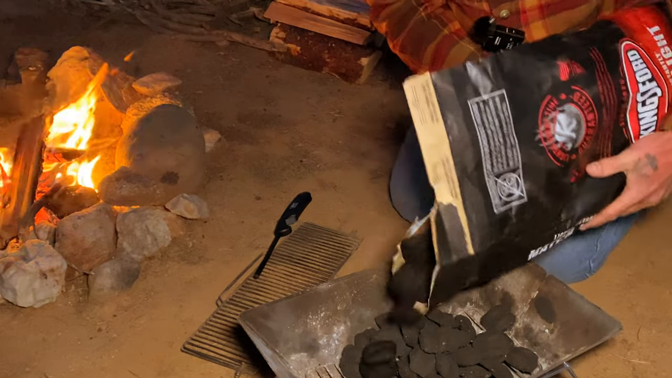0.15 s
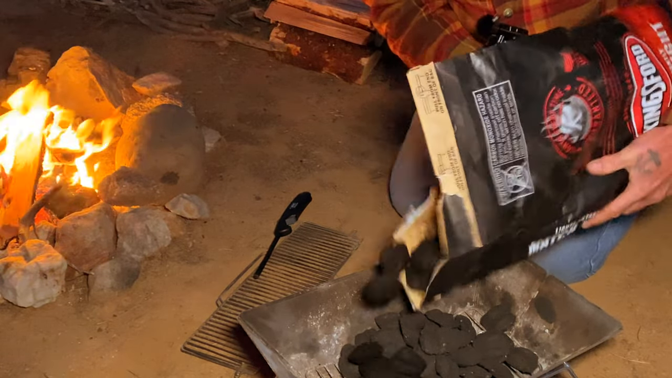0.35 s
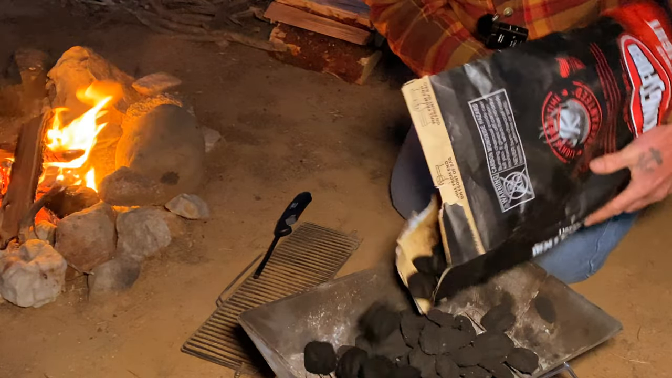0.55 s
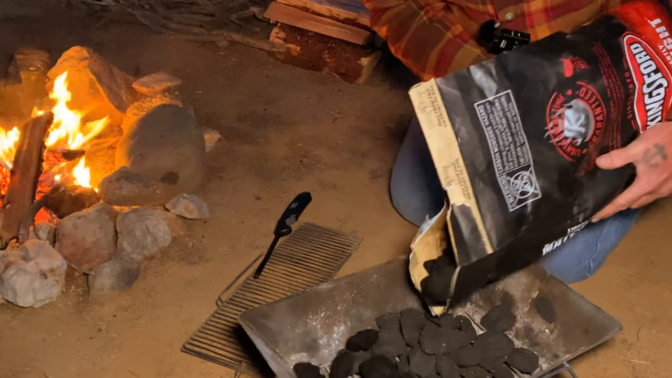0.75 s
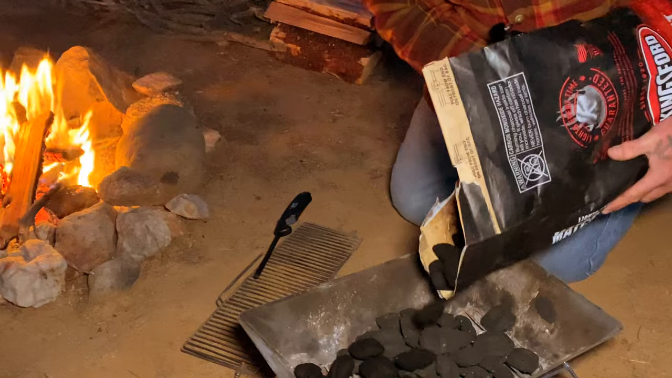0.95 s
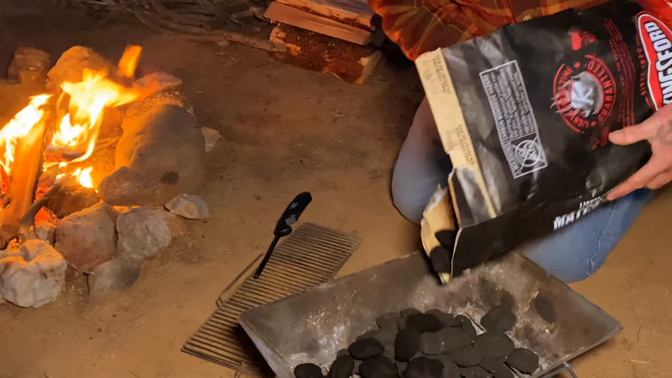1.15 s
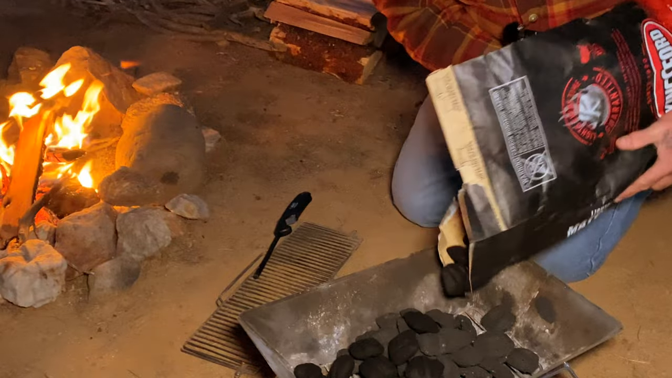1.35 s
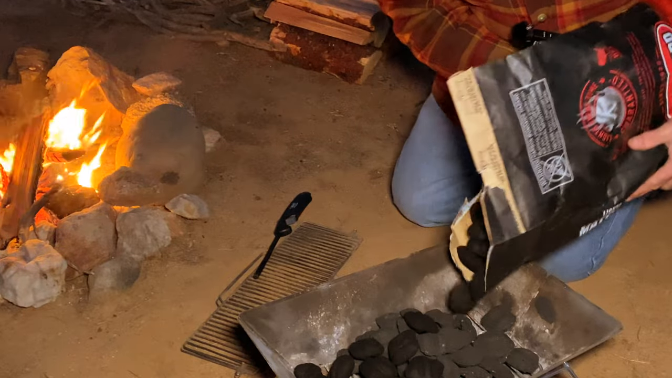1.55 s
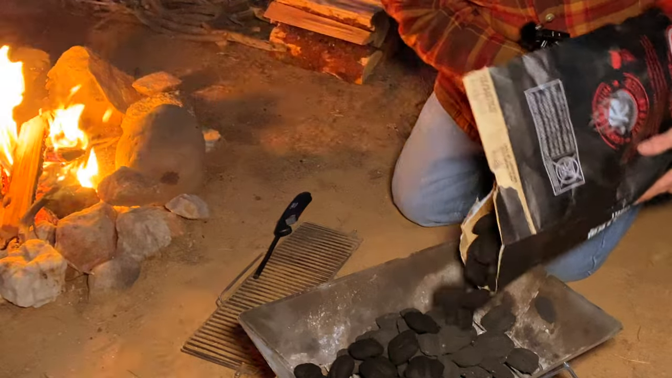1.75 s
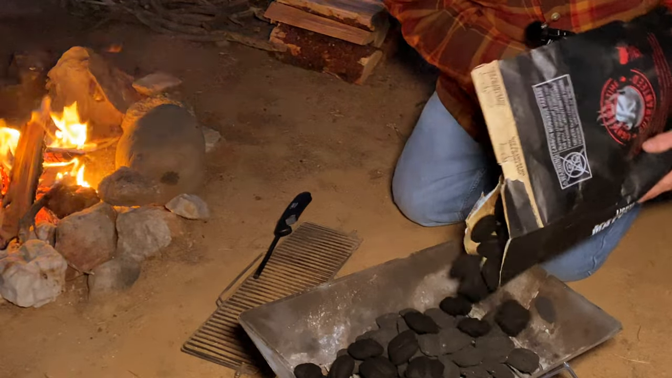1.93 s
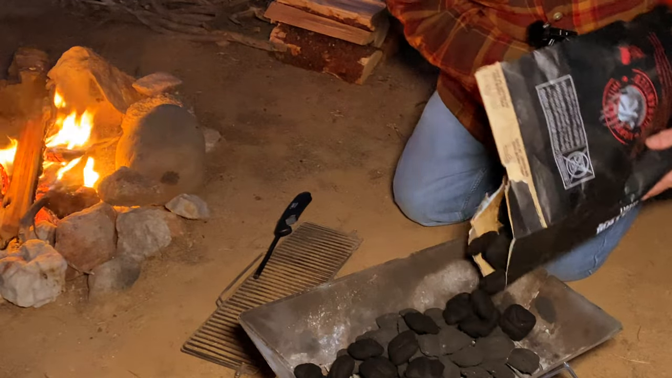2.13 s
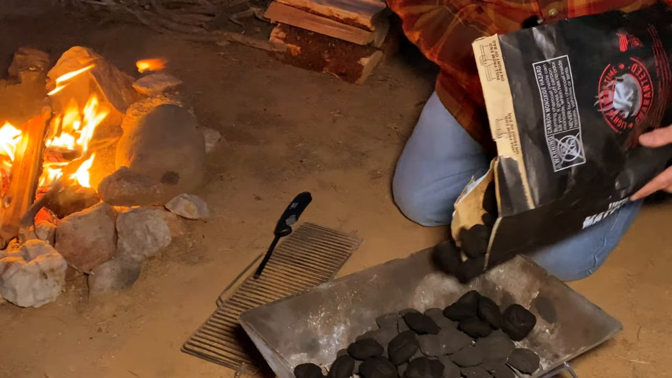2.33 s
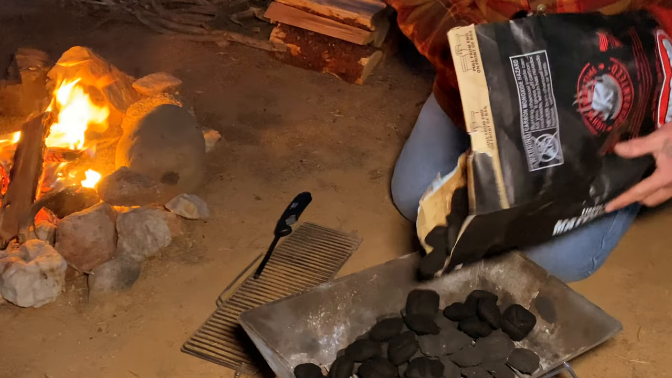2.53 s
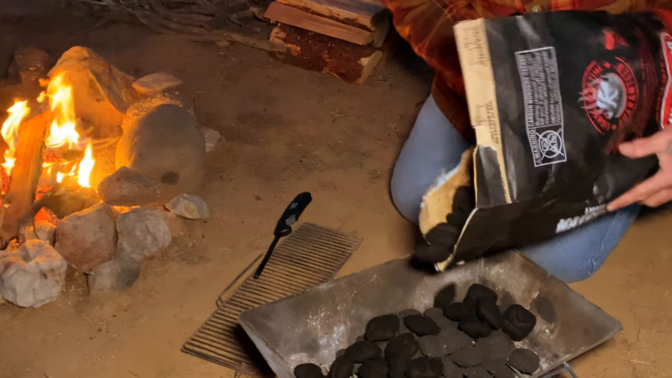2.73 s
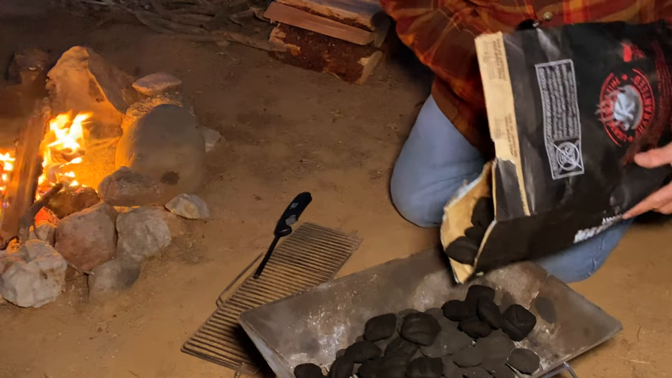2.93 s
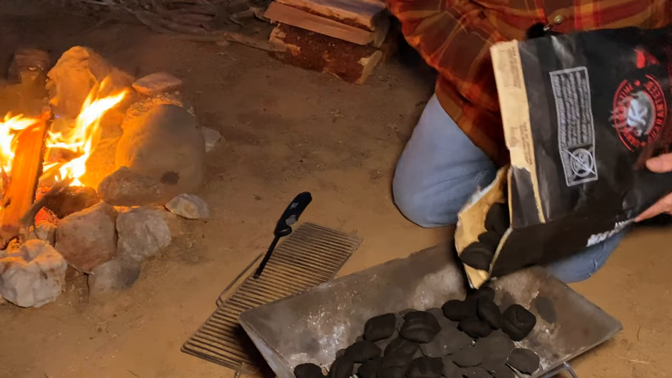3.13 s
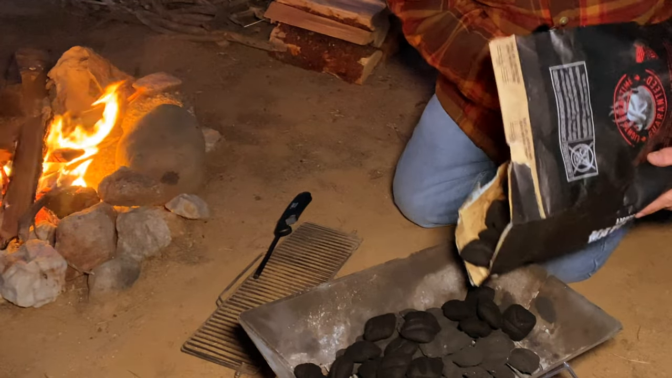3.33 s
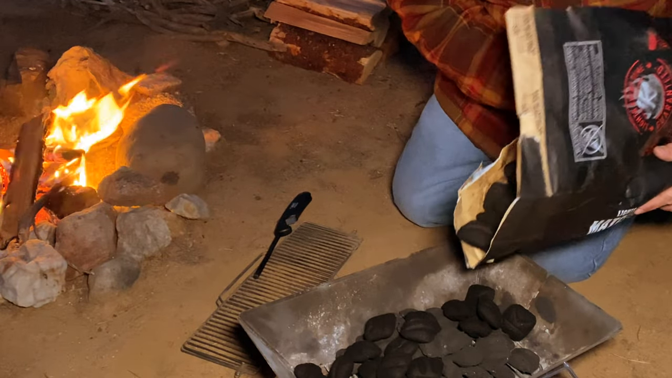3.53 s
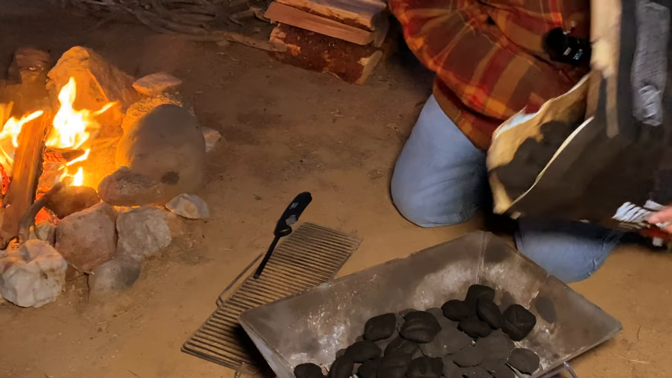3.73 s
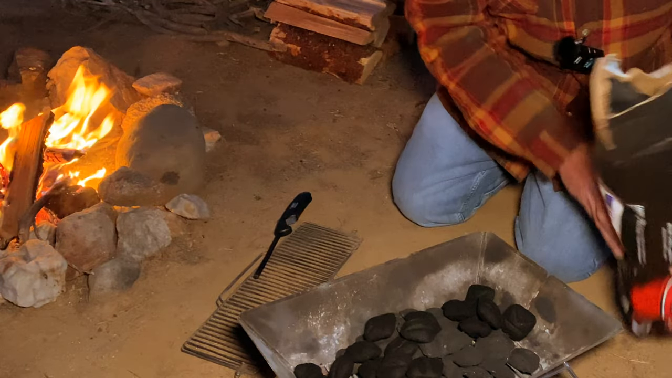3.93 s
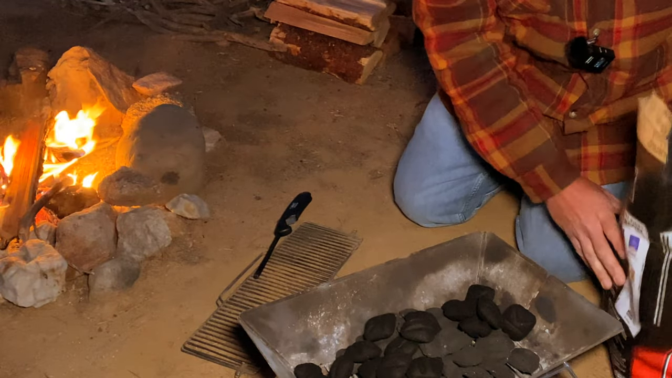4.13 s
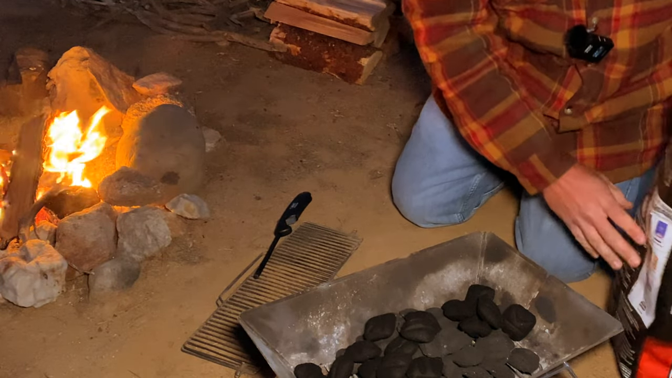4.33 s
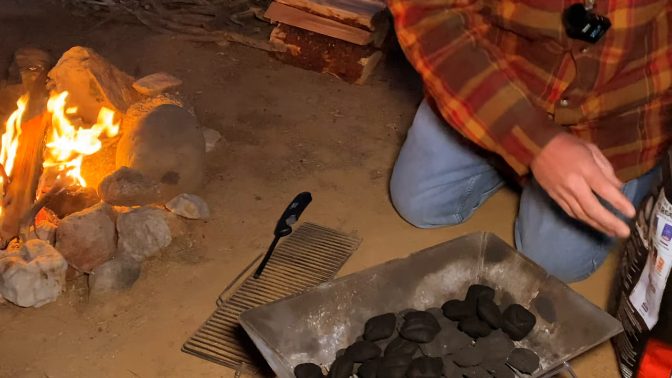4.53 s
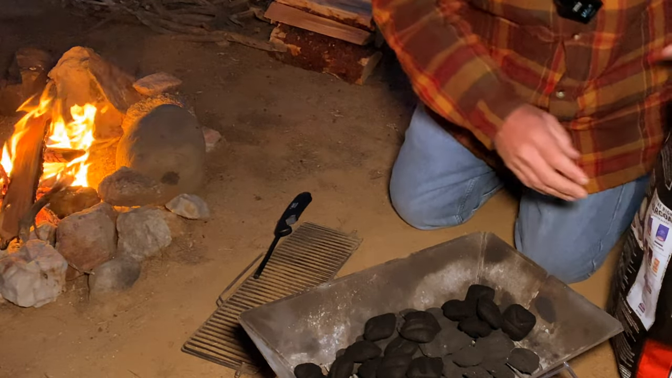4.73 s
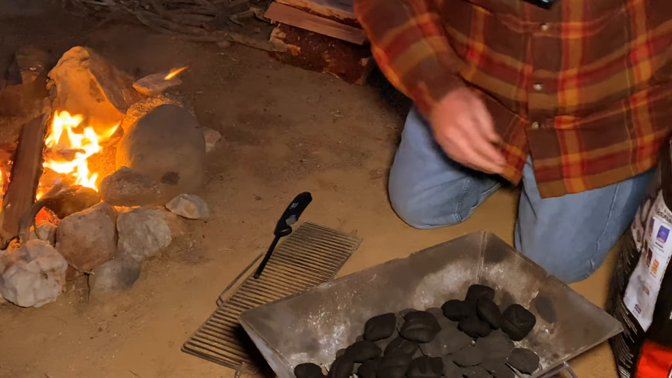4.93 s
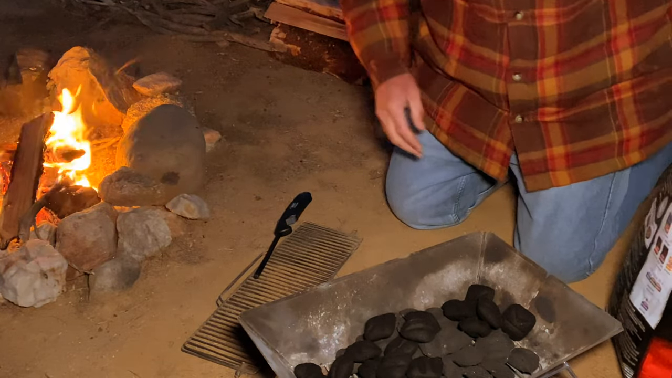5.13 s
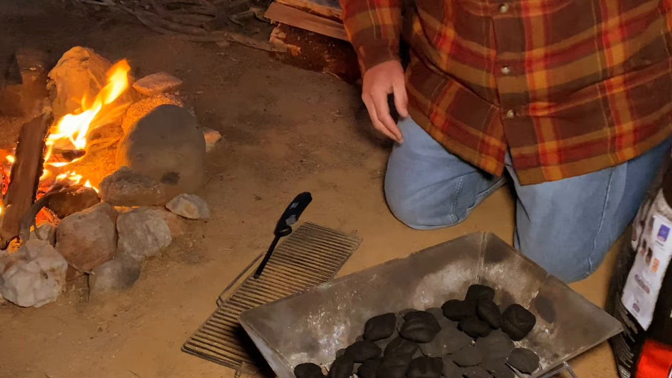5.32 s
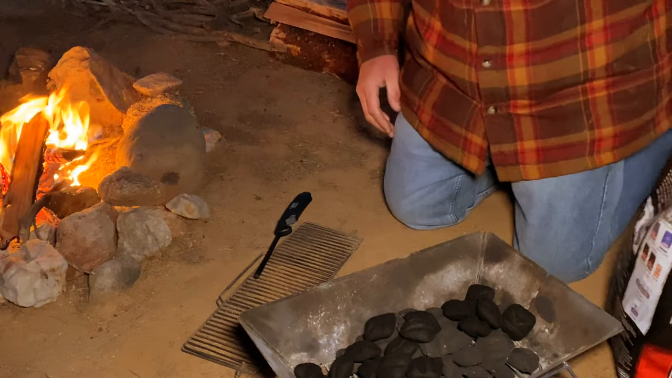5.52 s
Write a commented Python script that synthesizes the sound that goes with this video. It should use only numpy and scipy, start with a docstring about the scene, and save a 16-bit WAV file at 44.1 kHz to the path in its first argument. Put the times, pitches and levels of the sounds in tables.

```python
"""Charcoal poured from a paper bag

Briquettes slide out of a paper bag and knock onto a heap in a metal pan that lies on the dirt. Each blow sums
damped resonances (thud, knock) and filtered noise (crunch); the pan is a set of modes choked by the ground.
The bag is then set down against a wire basket, a second set of modes, and its load slumps and settles.
Grit, creasing paper and soft brushing are shaped noise and clicks; a campfire flutters and ticks nearby."""
import sys
import numpy as np
from scipy import signal
from scipy.fft import rfft, irfft
from scipy.io import wavfile
from scipy.ndimage import uniform_filter1d

SR = 44100
rng = np.random.default_rng(int(sys.argv[2]) if len(sys.argv) > 2 else 0)


def master(y):
    """Save y as 16-bit WAV."""
    cut = np.clip(np.atleast_2d(y).T, -1, 1)
    pcm = np.round(cut * 32767)  # scale
    wavfile.write(sys.argv[1], SR, pcm.astype(np.int16))


N = 245708
TIME = np.arange(N) / SR  # s
SHORT = TIME[:4096]  # time axis of a single contact, s
SET_DOWN_S = 3.7  # from here on the basket rings instead of the pan

# Spectrum of crushed charcoal. Each row: frequency in Hz, density in dB per Hz.
CRUNCH_SPECTRUM = [(700, -2.5), (1500, 1.5), (2300, 0.5), (3300, -1), (5000, -5), (7000, -9.5),
                   (9500, -18.5), (12000, -26), (16000, -33)]
# Spectrum of scraping grit and paper. Each row: frequency in Hz, density in dB per Hz.
GRIT_SPECTRUM = [(700, -18.5), (1500, 4.5), (2200, 0), (3200, 0), (5000, -0.5), (6800, -4.5), (9000, -12),
                 (12000, -21.5), (16000, -38)]


def undb(db):
    """Amplitude gain is ten to the power of a twentieth of the decibels."""
    return 10 ** (np.asarray(db) / 20)


def unit(x):
    """Normalise the mean power: scale to rms 1."""
    return x / np.sqrt(np.mean(x ** 2))


def burst(x, db):
    """Level by energy: a short sound's energy, spread over 10 ms, has this level."""
    return x * undb(db) * np.sqrt(0.01 * SR / np.sum(x ** 2))


def add(out, s, x):
    """Superposition: mix x into out at time s."""
    start = int(np.clip(s * SR, 0, N - 1))
    out[start:start + len(x)] += x[:N - start]


def colour(x, points):
    """Minimum-phase filtering: folding the cepstrum makes a causal filter through (Hz, dB) points."""
    size = len(SHORT)
    hz, db = np.transpose(points)
    bins_hz = np.arange(size // 2 + 1) * SR / size
    curve_db = np.interp(np.log(bins_hz + 1), np.log(hz), db)
    cepstrum = irfft(np.log(undb(curve_db)))
    cepstrum[1:size // 2] *= 2
    cepstrum[size // 2 + 1:] = 0
    response = irfft(np.exp(rfft(cepstrum)))
    return signal.fftconvolve(x, response)[:len(x)]


def ring(x, modes):
    """Modal synthesis: x drives decaying modes (Hz, dB, t60), each with gain near its dB at resonance."""
    t = TIME[:SR // 2]
    response = np.zeros(len(t))
    for hz, db, t60 in modes:
        resonance_scale = 2 * np.log(1000) / (t60 * SR)
        response += undb(db - 60 * t / t60) * np.cos(2 * np.pi * hz * t) * resonance_scale
    return signal.fftconvolve(x, response)[:N]


def knock(hz, cycles, push):
    """Heavily damped resonance: it decays over `cycles`; the contact builds up over `push` cycles."""
    turns = hz * SHORT
    contact_rise = (1 - np.exp(-turns / push)) ** 2
    phase = rng.uniform(0, 2 * np.pi)
    swing = np.exp(-turns / cycles) * contact_rise * np.sin(2 * np.pi * turns + phase)
    return np.gradient(swing)


def specks(rate, spread_db):
    """Random impulse process at `rate` per second: many tiny clicks, a few large."""
    size = undb(spread_db * np.minimum(rng.exponential(size=N), 5))
    occurs = rng.random(N) < rate / SR
    return occurs * size * rng.choice([-1, 1], N)


def campfire():
    """Turbulence noise: a low flutter of the flames, with sparse impulses as small dry ticks."""
    # Spectrum of the flames. Each row: frequency in Hz, density in dB per Hz.
    fire_spectrum = [(18, 9), (35, 5.5), (120, 5.5), (280, 4.5), (400, -10.5), (800, -5.5), (1500, -20),
                     (3500, -19), (6000, -27.5), (15000, -30.5)]
    flames = unit(colour(rng.standard_normal(N), fire_spectrum))
    ticks = unit(colour(specks(rate=30, spread_db=3), CRUNCH_SPECTRUM))
    return undb(-64) * flames + undb(-79) * ticks


def outdoors(x, wet_db, t60):
    """Diffuse scattering: a faint, short decaying noise tail from ground, stones and woodpile."""
    t = TIME[:SR // 2]
    first_return_s = 0.004
    tail = rng.standard_normal(len(t)) * np.exp(-np.log(1000) * t / t60) * (t > first_return_s)
    tail = colour(tail, [(100, 6), (1500, 2), (6000, -17), (15000, -3.5)])
    tail /= np.sqrt(np.sum(tail ** 2))
    return x + undb(wet_db) * signal.fftconvolve(x, tail)[:N]


def brushing():
    """Friction noise: dense fine clicks swell softly as paper or a shirt sleeve brushes past."""
    # Passing strokes. Each row: middle in seconds, half width in seconds, level in dB.
    strokes = [(1.87, 0.16, -47.5), (2.869, 0.068, -42.5), (4.62, 0.021, -53.5), (4.92, 0.019, -49),
               (5.31, 0.039, -55)]
    # Spectrum of the friction. Each row: frequency in Hz, density in dB per Hz.
    brush_spectrum = [(400, 9), (1200, 0), (2500, -1.5), (4200, 0), (6500, -6), (9000, -10.5), (13500, -23),
                      (16000, -40)]
    swell = np.zeros(N)
    for s, width, db in strokes:
        swell += undb(db) * np.exp(-0.5 * ((TIME - s) / width) ** 2)
    return swell * unit(colour(specks(rate=5000, spread_db=0.5), brush_spectrum))


def pops():
    """Strong damping: little pitched ticks and pops die within a few cycles."""
    # Ticks and pops. Each row: start in seconds, pitch in Hz, level in dB.
    pop_times = [(3.393, 1500, -70), (3.461, 2260, -68), (4.7357, 834, -42.5), (5.099, 1190, -51),
                 (5.122, 1530, -50), (5.157, 1460, -53), (5.396, 1970, -53)]
    out = np.zeros(N)
    for s, hz, db in pop_times:
        add(out, s, burst(knock(hz, cycles=2.1, push=0.7), db))
    return out


def snaps():
    """Brittle fracture: creasing paper and chipping charcoal give noise clicks about a millisecond long."""
    # Bright snaps. Each row: start in seconds, peak in dB before a common cut of 1 dB.
    snap_times = [(0.0692, -37), (0.1239, -12), (0.5389, -7), (0.572, -29), (0.5849, -27), (0.756, -30),
                  (1.12, -30), (1.18, -34), (1.5195, -32), (1.81, -27.5), (2.278, -31.5), (2.363, -39),
                  (3.13, -33.5), (3.395, -53.5), (3.584, -51), (3.863, -41), (4.0242, -21), (4.268, -34),
                  (4.288, -19), (4.304, -23), (5.085, -37), (5.402, -36.5)]
    # Spectrum of a snap. Each row: frequency in Hz, density in dB per Hz.
    snap_spectrum = [(800, -2), (2000, -5.5), (4000, 1.5), (6800, -1), (9000, -11.5), (11000, -12),
                     (13000, -35), (16000, -24)]
    decay_s = 0.0013
    out = np.zeros(N)
    for s, db in snap_times:
        click = colour(rng.standard_normal(len(SHORT)) * np.exp(-SHORT / decay_s), snap_spectrum)
        add(out, s, undb(db - 1) * click / np.max(np.abs(click)))
    return out


def contact(thud_hz, knock_hz, hollow=0):
    """Impact of two bodies: the low thud of what lies beneath and a knock of three choked modes."""
    thud = burst(knock(thud_hz, cycles=0.87 + hollow, push=0.47), 0)
    first = knock(knock_hz, cycles=1.72, push=0.3)
    second = knock(knock_hz * rng.uniform(1.35, 1.9), cycles=2.9, push=0.9)
    third = knock(knock_hz * rng.uniform(2.1, 3.1), cycles=3.8, push=1.6)
    lump = burst(first, 0) + burst(second, -8) + burst(third, -12)
    return thud, lump


def flow():
    """Granular flow: powers add of a steady creep and of avalanches that swell quickly and run out."""
    # Creep while the bag is tipped, then raised. Each row: time in seconds, level in dB.
    pour = [(0, -35), (.3, -38), (.72, -37), (.9, -46), (1.0, -49.5), (1.17, -47.5), (1.3, -36),
            (1.62, -42.5), (2.05, -41), (2.22, -47.5), (2.32, -52), (2.44, -50), (2.55, -41), (2.92, -51.5),
            (3.0, -61), (3.28, -64), (3.35, -69.5), (3.52, -80)]
    # Creep while the bag is swung aside, put down and let go. Each row: time in seconds, level in dB.
    handling = [(3.68, -66), (3.98, -48.5), (4.1, -40), (4.2, -27), (4.33, -32.5), (4.47, -48.5),
                (4.7, -65), (4.8, -58.5), (5.06, -47), (5.22, -59), (5.45, -54.5), (5.57, -39.5)]
    # Small avalanches as the load gives way. Each row: peak time in seconds, level in dB, decay in seconds.
    surges = [(0.2, -30.5, 0.015), (0.439, -27.5, 0.04), (0.595, -51, 0.034), (0.674, -43, 0.016),
              (0.815, -35.5, 0.028), (0.962, -35.5, 0.012), (1.112, -38, 0.013), (1.333, -27.5, 0.037),
              (1.548, -31, 0.025), (1.69, -37.5, 0.026), (1.77, -37, 0.016), (1.962, -33.5, 0.019),
              (2.03, -42, 0.029), (2.177, -38.5, 0.057), (2.488, -45, 0.028), (2.61, -32, 0.024),
              (2.732, -36.5, 0.0082), (2.925, -52, .015), (3.125, -55, .02), (3.21, -61, 0.031),
              (3.788, -54, 0.016), (3.92, -50, 0.042), (4.062, -38.5, 0.03), (4.146, -21.5, 0.048),
              (4.295, -25, 0.013), (4.41, -46, 0.033), (4.601, -53, 0.059), (5.01, -39.5, 0.027),
              (5.519, -36.5, 0.027)]
    rise_s = 0.015
    power = undb(np.interp(TIME, *np.transpose(pour + handling))) ** 2
    for s, db, decay in surges:
        before, after = np.maximum(s - TIME, 0), np.maximum(TIME - s, 0)
        surge = undb(db) * np.exp(-0.5 * (before / rise_s) ** 2 - after / decay)
        power = power + surge ** 2
    return np.sqrt(power)


def steady(x):
    """Short-time power normalisation over about 30 ms: single contacts stand out, the load stays even."""
    power = uniform_filter1d(x ** 2, int(0.03 * SR))
    power = uniform_filter1d(power, int(0.015 * SR))
    return x / np.sqrt(power + 1e-3)


def tumble(count, spread_db):
    """Random collisions: lumps bump at uneven times, giving thuds, knocks and the force of contact."""
    thuds, knocks, force = np.zeros((3, N))
    press = np.exp(-SHORT / 0.003) - np.exp(-SHORT / 0.0006)  # slower release, fast onset
    for k, (when, strength, size, height, softness) in enumerate(rng.random((count, 5))):
        s = (k + 2.5 * when - 1) / count * N / SR
        db = spread_db * strength ** 2
        thud, lump = contact(thud_hz=145 * 3.06 ** height, knock_hz=510 * 2.423 ** size)
        add(thuds, s, undb(db + 3.3 * softness) * thud)  # blows on the paper wall thud more
        add(knocks, s, undb(db - 12.3 * size) * lump)  # small lumps (size near 1) knock higher and weaker
        add(force, s, undb(db - 9.3 * softness) * press)
    return unit(thuds), unit(knocks), unit(force)


def crumbs(count, low_hz, high_hz, cycles):
    """Resonance scales with size: chips of each size tick drily at their own pitch and times."""
    mix = np.zeros(N)
    for hz in np.geomspace(low_hz, high_hz, count):
        tick = burst(knock(hz, cycles, push=0.35), 0)
        ticks = signal.oaconvolve(specks(rate=230, spread_db=3.4), tick)[:N]
        mix += np.sqrt(hz) * ticks
    return unit(colour(mix, GRIT_SPECTRUM))


def sliding():
    """Friction and collision in a moving load: lumps bump each other and paper, grit scrapes, the bag sags."""
    # Balance against the knocks as the load moves from the mouth to the bottom of the bag.
    # Each row: time in seconds, thuds in dB, grit and paper in dB.
    balance = [(0, -1, -8), (1.6, 1.5, -8), (2.7, 2, -7), (3.2, 7, -5.5), (3.8, 6.5, -4.5),
               (4.15, -2.5, -6.5), (4.75, 2, 0), (5.05, -0.5, -3.5), (5.57, -1.5, -6)]
    # Spectrum of the sagging bag. Each row: frequency in Hz, density in dB per Hz.
    sag_spectrum = [(15, -9), (30, -22), (50, -5.5), (80, 0.5), (110, -1.5), (170, -4), (300, -26.5),
                    (1000, -76.5)]
    s, thud_points, grit_points = np.transpose(balance)
    thud_db = np.interp(TIME, s, thud_points)
    grit_db = np.interp(TIME, s, grit_points)

    thuds, knocks, force = tumble(count=1400, spread_db=6.5)
    sag = unit(colour(rng.standard_normal(N) * force, sag_spectrum))
    # grit sounds mostly where lumps touch
    scrape = unit(colour(rng.standard_normal(N) * (force + 0.2), GRIT_SPECTRUM))
    chips = crumbs(count=9, low_hz=1700, high_hz=10500, cycles=2.8)
    paper = unit(colour(specks(rate=900, spread_db=2.5), GRIT_SPECTRUM))

    body = undb(-0.5) * steady(thuds) + undb(-8) * sag
    dust = undb(-0.28) * steady(scrape + undb(-6.5) * chips + undb(-5) * paper)
    return flow() * (undb(-1) * steady(knocks) + undb(thud_db) * body + undb(grit_db) * dust)


def crunch(decay, spread_db, tail_db, tail_s, rise_s):
    """Crushing noise: clicks of crumbs thicken as the lump presses in, then scatter."""
    size_db = spread_db * rng.standard_normal(len(SHORT))
    clicks = rng.standard_normal(len(SHORT)) * undb(size_db)
    release = np.exp(-SHORT / decay) + undb(tail_db) * np.exp(-SHORT / tail_s)
    pressure = (1 - np.exp(-SHORT / rise_s)) * release
    return colour(clicks * pressure, CRUNCH_SPECTRUM)


def gritty(decay):
    """Noise-driven resonance: the crunch of a lump's surface excites a brittle ring of its own."""
    crushed = crunch(decay, spread_db=0.5, tail_db=-10.5, tail_s=0.0085, rise_s=0.0003)
    resonance = knock(rng.uniform(2400, 6000), cycles=4, push=0.3)
    brittle = signal.fftconvolve(crushed, resonance)[:len(SHORT)]
    return unit(crushed) + undb(-10) * unit(brittle)


def blows():
    """Contact stiffness sets the spectrum: soft landings thud, hard ones knock and crunch; scrapes crunch."""
    # Lumps striking heap, pan or bag. Each row: start in seconds, level in dB before the
    # hardness weighting, hardness from 0 to 1, knock pitch in Hz.
    strikes = [(0.0011, -22.5, 0.35, 612), (0.0356, -33.5, 0.98, 1610), (0.1241, -27.5, .6, 1110),
               (0.143, -34, 0.17, 710), (0.1969, -28.5, 0.73, 640), (0.206, -26, 0, 840),
               (0.22, -27.5, 0.2, 660), (0.3554, -30, 0.48, 810), (0.369, -37, .05, 686),
               (0.386, -24.5, 0.56, 590), (0.4271, -33, 0.6, 570), (0.4378, -25.5, 0.2, 706),
               (0.453, -39.5, 1, 845), (0.539, -19.5, 0.45, 702), (0.569, -32, 0.4, 705),
               (0.5834, -22.5, 0.86, 575), (0.662, -34.5, 0.74, 710), (0.6709, -27, .6, 610),
               (0.7216, -44, .45, 640), (0.806, -37, 0.88, 670), (0.8927, -38, 0.63, 770),
               (0.929, -34.5, 0.78, 1084), (0.948, -38, 0, 430), (1.016, -39, 0.4, 765),
               (1.0412, -39, 0.49, 840), (1.1123, -38, 0, 474), (1.194, -44.5, 1, 910),
               (1.215, -42, 0.7, 700), (1.2485, -31, 0.48, 796), (1.322, -34, .65, 864),
               (1.354, -33, 0.77, 1095), (1.4612, -35, 0.2, 674), (1.4819, -28.5, .45, 700),
               (1.539, -30, 0.32, 636), (1.6092, -40.5, 0.76, 850), (1.651, -34.5, 0, 596),
               (1.7573, -36.5, 0.05, 570), (1.8593, -31.5, 0.35, 756), (1.9603, -35, .4, 504),
               (2.0954, -33.5, 0.4, 595), (2.1638, -35.5, .1, 530), (2.213, -35, 0.4, 790),
               (2.3945, -50.5, 0.9, 670), (2.505, -36, 0.88, 660), (2.5403, -33, 0.44, 687),
               (2.5986, -36, 0.5, 640), (2.6152, -32, 0.47, 1080), (2.74, -36, 0.5, 655),
               (2.7972, -36.5, 0.47, 554), (2.8322, -31, 0.1, 644), (2.9177, -39, 0.77, 1100),
               (3.0264, -39, 0.26, 770), (3.1031, -41.5, 0.15, 580), (3.299, -39.5, 0, 588),
               (3.4268, -55.5, 0.33, 533), (3.861, -42.5, 0.98, 920), (3.9253, -30.5, 0.45, 600),
               (4.0238, -34.5, 0.43, 607), (4.1404, -18, 0.26, 626), (4.151, -24, 1, 1100),
               (4.164, -18.5, 0.4, 745), (4.1963, -42, .6, 725), (4.2052, -31, 0.77, 785),
               (4.2761, -25.5, 0.6, 640), (4.3105, -32, 0.9, 610), (4.333, -29, .6, 830),
               (4.3962, -33, 0.6, 535), (4.422, -39.5, 0.83, 810), (4.5952, -48, 0.8, 570),
               (4.8286, -41.5, 0.64, 1460), (4.9854, -38.5, 0.89, 596), (5.0102, -43, 1, 850),
               (5.0498, -46.5, 1, 700), (5.249, -49.5, 0.76, 680), (5.3934, -53.5, .65, 1150),
               (5.5028, -40.5, 0.93, 580), (5.5409, -29.5, .55, 590)]
    # A lump grinding over others or over the paper. Each row: start in seconds, level in dB, decay in seconds.
    scrapes = [(0.0183, -42.5, 0.0032), (0.5867, -25.5, 0.012), (2.0329, -31.5, 0.0098),
               (2.472, -42, .0045), (2.5814, -35, 0.014), (2.6638, -40, 0.01), (2.7161, -39, 0.01),
               (4.0852, -35, 0.0034), (4.241, -27, 0.0087), (4.266, -24.5, 0.0015), (4.2881, -38, 0.0031)]
    thud_ratio = 0.435  # pitch of the thud over that of the knock
    hollow_cycles = 0.43  # how much longer the softest landing's thud rings than the hardest's
    # what the hardest blow lacks in thud, and the softest in knock and crunch
    hard_thud_db, soft_knock_db, soft_crunch_db = -26, -10.5, -24
    out = np.zeros(N)
    for s, db, hard, hz in strikes:
        soft = 1 - hard
        thud, lump = contact(thud_ratio * hz, hz, hollow_cycles * soft ** 2)
        add(out, s, burst(thud, db + hard_thud_db * hard ** 2))
        add(out, s, burst(lump, db + soft_knock_db * soft ** 2))
        add(out, s, burst(gritty(decay=0.003), db + soft_crunch_db * soft))
    for s, db, decay in scrapes:
        add(out, s, burst(gritty(decay), db))
    return out


def pan(x):
    """Modes of a plate: sheet metal rings when driven, damped by soil and charcoal."""
    # Each row: mode frequency in Hz, relative gain in dB, t60 in seconds.
    pan_modes = [(1380, 8, 0.031), (2440, -0.5, 0.076), (3030, 0, 0.083), (3300, 10, 0.072),
                 (4750, -11, 0.083), (5400, -21, .07), (6670, -7, .05), (7900, -17, .06)]
    return undb(-9) * ring(x, pan_modes)


def basket(x):
    """Modes of a wire frame: the basket that the bag leans on rings when driven."""
    # Each row: mode frequency in Hz, relative gain in dB, t60 in seconds.
    basket_modes = [(1346, -3, 0.1), (1580, -4, 0.081), (1936, 2.5, 0.15), (1970, 3, 0.037),
                    (2125, -4, 0.04), (3740, -4, 0.18), (4260, -2, 0.15), (4550, -9, .2), (5170, -5, 0.15),
                    (5300, 4, 0.18), (5570, -10, 0.14)]
    return undb(-4) * ring(x, basket_modes)


def scene():
    """Coupled resonators: blows and snaps ring the pan; once the bag is down, its load too shakes the basket."""
    struck = blows() + snaps()
    direct = struck + sliding()
    ringing = pan(struck * (TIME < SET_DOWN_S)) + basket(direct * (TIME >= SET_DOWN_S))
    near = direct + ringing + brushing() + pops()
    return (outdoors(near, wet_db=-19, t60=0.2) + campfire())[None]


def record(dry):
    """Band limiting: the microphone loses the deepest rumble and the very top."""
    high_pass = signal.butter(2, 28, "high", fs=SR, output="sos")
    low_pass = signal.ellip(8, 0.2, 70, 15800, fs=SR, output="sos")
    return signal.sosfilt(low_pass, signal.sosfilt(high_pass, dry))


dry = scene()
out = record(dry)
master(out)
```